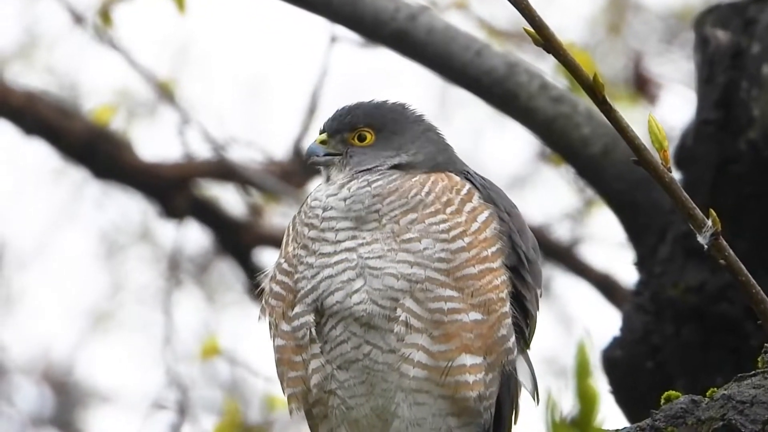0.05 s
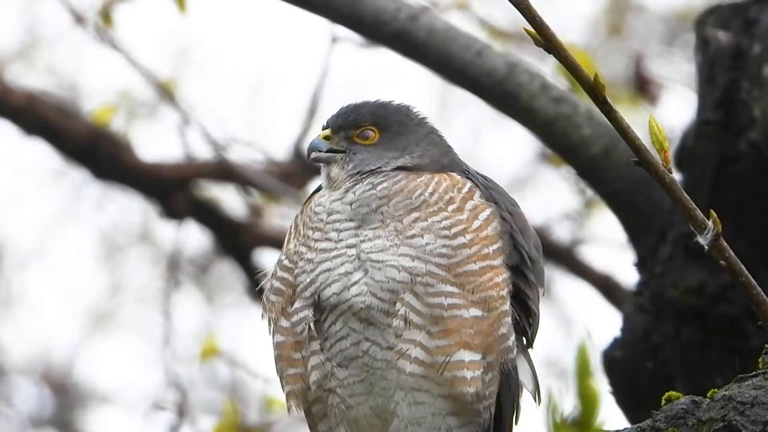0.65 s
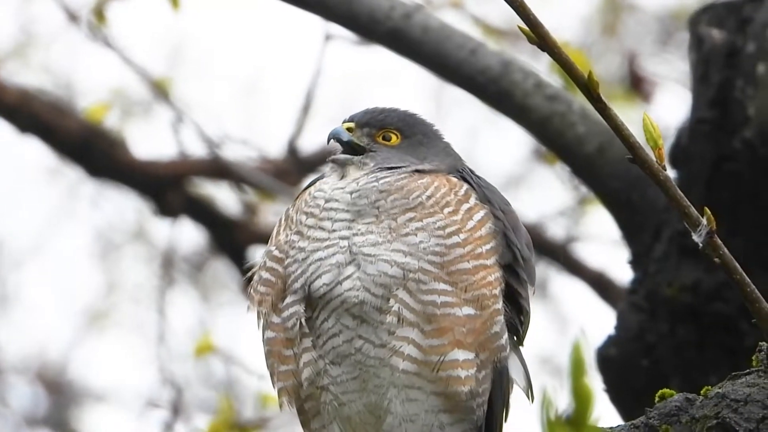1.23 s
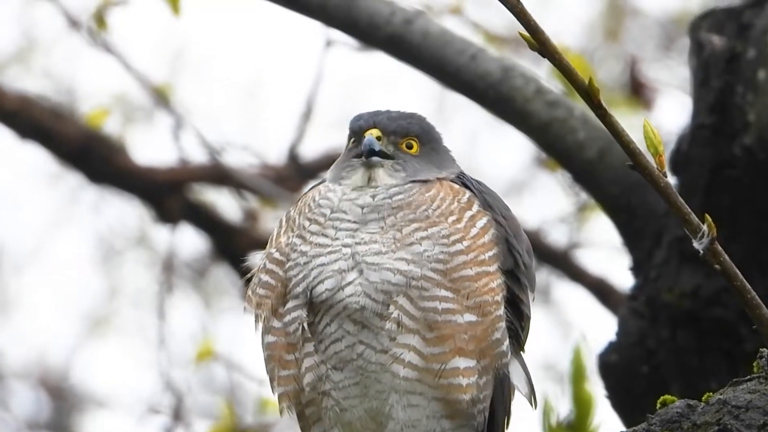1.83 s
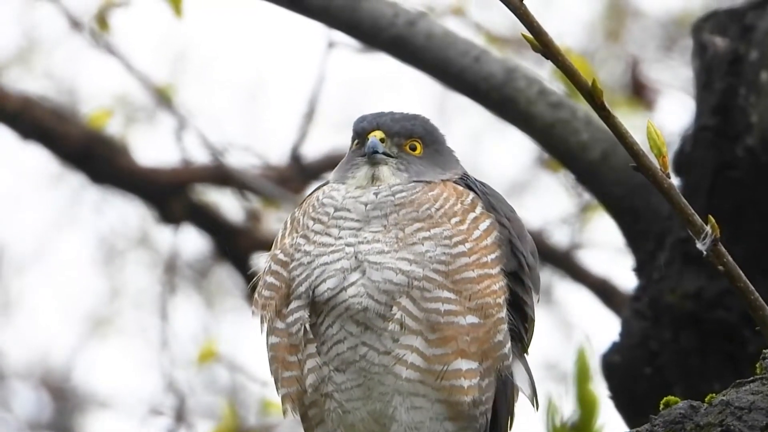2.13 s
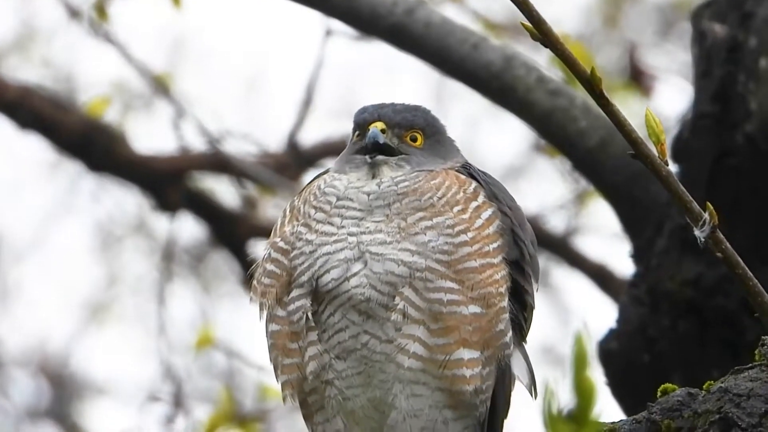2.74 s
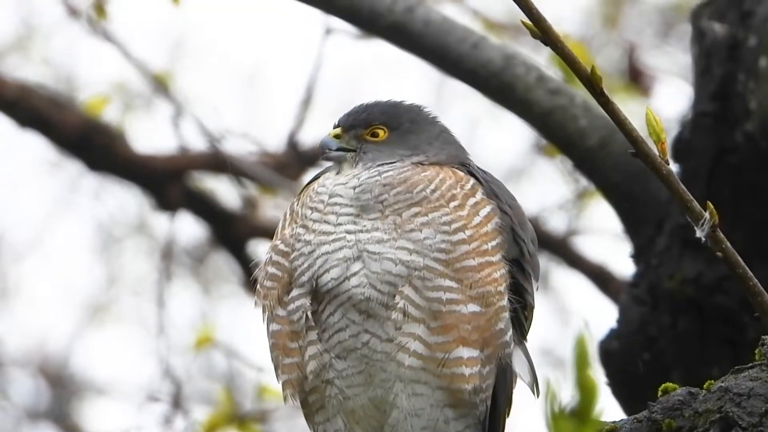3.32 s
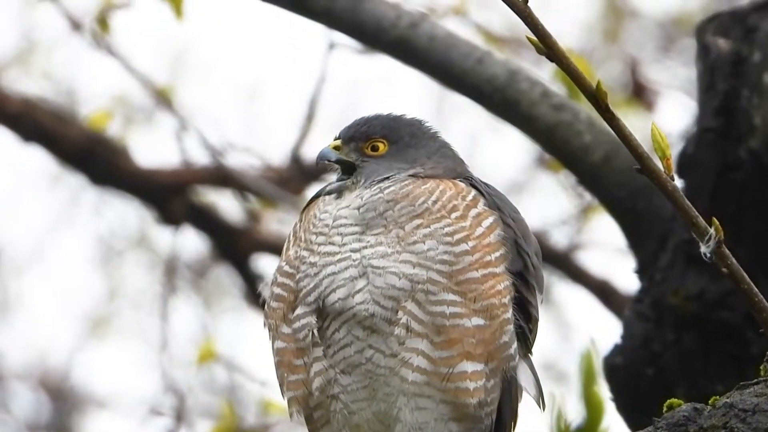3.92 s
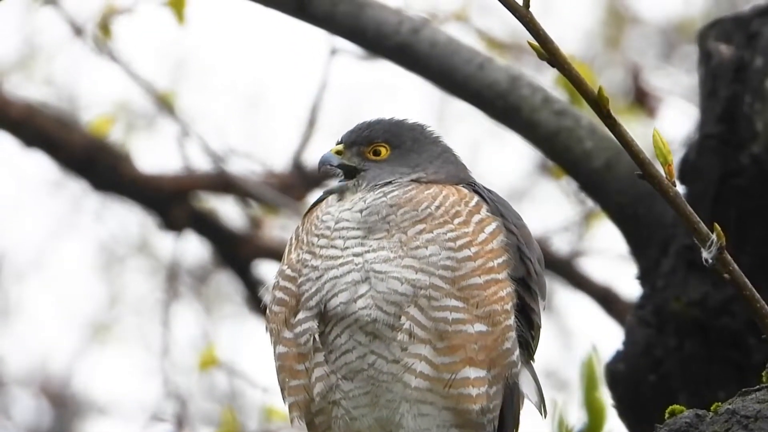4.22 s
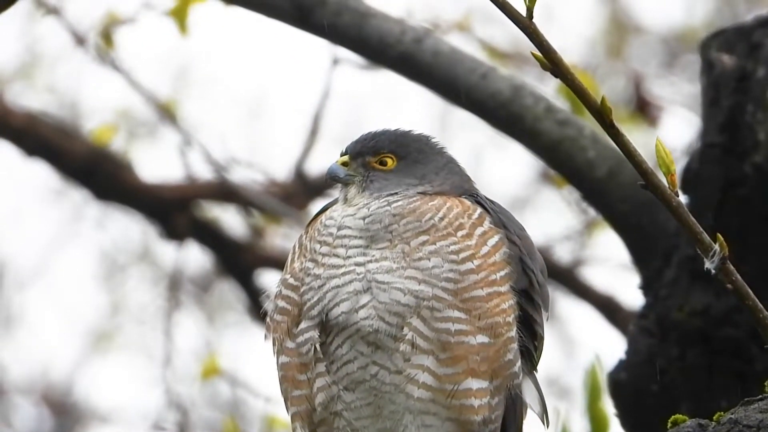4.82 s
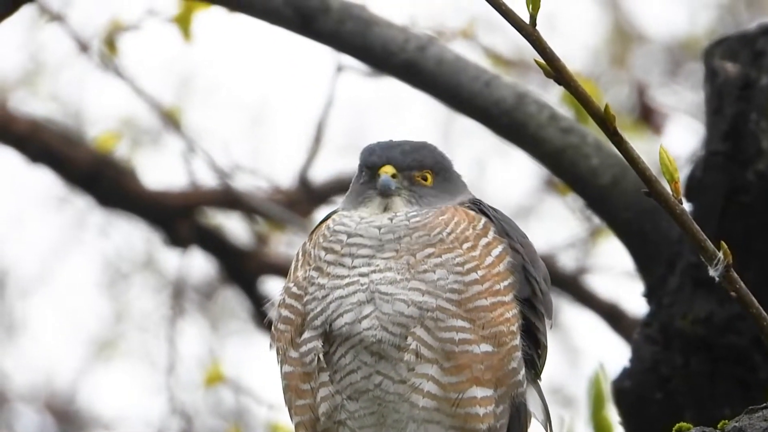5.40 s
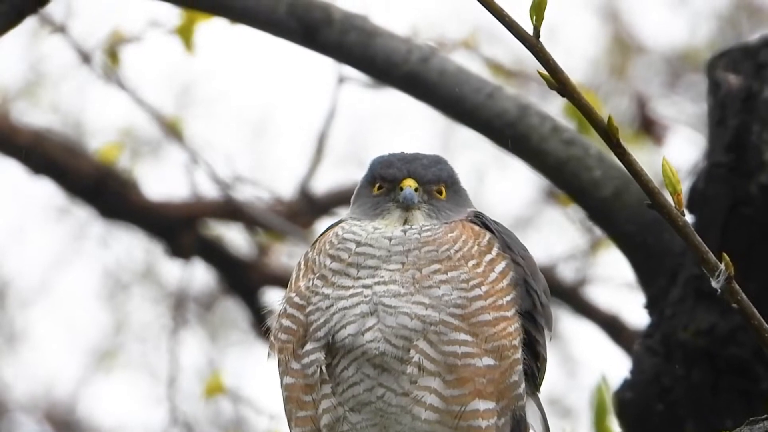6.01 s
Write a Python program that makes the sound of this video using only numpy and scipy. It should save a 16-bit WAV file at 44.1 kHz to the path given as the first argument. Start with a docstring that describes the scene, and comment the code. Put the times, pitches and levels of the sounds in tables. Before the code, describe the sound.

Short shrill calls from a small hawk in a tree repeat and grow louder, echoing lightly, with far traffic humming behind.

```python
"""Far traffic hums throughout, under the hiss of two closely spaced microphones.
From the start a small hawk in a tree calls eighteen short arched notes, soft at first, then loud:
each is four harmonics filtered by the throat, and branches and grove reflect it.
Near 1.8 s the bird faces the listener and its call brightens. A tick (2.3 s) and a low bump (2.5 s)
sound close by. By 3.7 s the beak points aside again; the last note comes at 4.7 s and dies away."""
import sys
import numpy as np
from scipy import signal
from scipy.fft import rfft, irfft, next_fast_len
from scipy.io import wavfile

SR = 44100
rng = np.random.default_rng(int(sys.argv[2]) if len(sys.argv) > 2 else 0)


def pcm_store(signal):
    """Save signal as 16-bit PCM."""
    levels = np.round(np.clip(np.atleast_2d(signal), -1, 1) * 32767)
    wavfile.write(sys.argv[1], SR, levels.astype(np.int16).T)


N = 267069

# the bird turns its head: (time [s], facing [0 beak aside .. 1 beak toward the listener])
FACING = [(1.55, 0), (1.8, 0.99), (3.15, 0.63), (3.7, 0.052)]


def gain_of(db):
    """Amplitude ratio of a level in decibels."""
    return 10 ** (np.asarray(db) / 20)


def add(mix, start_s, sound):
    """Superposition: a sound adds to the mix from start_s on."""
    part = mix[max(round(start_s * SR), 0):][:len(sound)]
    part += sound[:len(part)]


def resonance(hz, centre_hz, width_hz):
    """Lorentzian power response of one resonance, 1 at its centre."""
    return 1 / (1 + (2 * (hz - centre_hz) / width_hz) ** 2)


def coloured_noise(spectrum):
    """Spectral shaping: white noise filtered by a curve over log frequency, then scaled to rms 1."""
    size = next_fast_len(N)
    hz = np.fft.rfftfreq(size, 1 / SR)
    point_hz, point_db = np.transpose(spectrum)
    shape = gain_of(np.interp(np.log(hz + 1), np.log(point_hz + 1), point_db))
    noise = irfft(rfft(rng.standard_normal(size)) * shape, size)[:N]
    return noise / np.sqrt(np.mean(noise ** 2) + 1e-20)


def wander(size, rate):
    """Random modulation: low-passed noise of rms 1 that changes about rate times a second."""
    window = signal.windows.hann(int(2 * SR / rate) + 3)
    white = rng.standard_normal(size + len(window) - 1)
    return signal.fftconvolve(white, window / np.linalg.norm(window), "valid")


def traffic(tyre_db=-40, swell_db=-0.08, rumble_trim_db=-2):
    """Amplitude-modulated noise: far tyres barely swell, over a low rumble that comes and goes."""
    # tyre noise and rumble: (frequency [Hz], relative spectral density [dB])
    tyre_spectrum = [(20, -17), (60, -12), (200, -7.5), (280, -12.5), (450, -7.5), (620, -2.5), (800, 1),
                     (1000, -2), (1300, -6), (2000, -10), (3200, -13.5), (5000, -15.5), (8000, -20.5),
                     (16000, -39)]
    rumble_spectrum = [(10, -25), (30, 0.5), (60, 2), (110, 1), (180, -8), (280, -30), (800, -70)]
    # envelope of the rumble: (time [s], level before the trim [dB])
    rumble_envelope = [(0.2, -66.5), (1.37, -55), (2.56, -61.5), (2.69, -53.5), (3.75, -62.5), (4.78, -50),
                       (6.05, -52.5)]
    tyres = gain_of(tyre_db + swell_db * wander(N, 9.5)) * coloured_noise(tyre_spectrum)
    rumble_db = np.interp(np.arange(N) / SR, *np.transpose(rumble_envelope)) + rumble_trim_db
    return tyres + gain_of(rumble_db) * coloured_noise(rumble_spectrum)


def knocks():
    """Gaussian tone pulses: a few cycles each, heard as a sharp tick and a soft low bump."""
    # small knocks nearby: (time [s], frequency [Hz], envelope peak [dB], 1/e half-width [s])
    pulses = [(2.2846, 3380, -15.5, .0015), (2.286, 1560, -35, .004), (2.547, 200, -30.5, .006)]
    t = np.arange(-SR // 40, SR // 40) / SR
    sound = np.zeros(N)
    for centre_s, hz, db, width_s in pulses:
        envelope = gain_of(db) * np.exp(-(t / width_s) ** 2)
        add(sound, centre_s + t[0], envelope * np.sin(2 * np.pi * hz * t))
    return sound


def grove(voice, near_t60=0.058, build_up_s=0.0068, stereo_spread=0.29, trunks_per_s=1500):
    """Reverberation: twigs close by scatter a short wash; the many trunks return a long tail."""
    # response of the trees: (frequency [Hz], reverberation time of the tail [s], gain [dB])
    bands = [(1700, 0.95, 6.5), (3380, 0.94, 3), (5590, 0.92, 3.5), (6880, 0.61, 15)]
    band_hz, t60, band_db = np.transpose(bands)
    t = np.arange(SR + SR // 2) / SR
    stereo = (2, len(t))
    onset = 1 - np.exp(-t / build_up_s)
    trunks = onset * np.sign(rng.standard_normal(stereo)) * (rng.random(stereo) < trunks_per_s / SR)
    twigs = onset * rng.standard_normal(stereo) * 1000 ** (-t / near_t60)
    # balance the energy of tail and wash ahead of the band gains
    trunks *= gain_of(-15.5) / np.linalg.norm(trunks * 1000 ** (-t / t60.mean()), axis=1, keepdims=True)
    twigs *= gain_of(-18) / np.linalg.norm(twigs[0])
    hz, frame_s, (far, near) = signal.stft(np.array([trunks, twigs]), SR, nperseg=256)
    decay = 1000 ** (-frame_s / np.interp(hz, band_hz, t60)[:, None])
    colour = gain_of(np.interp(hz, band_hz, band_db))[:, None]
    impulse_response = signal.istft((far * decay + near) * colour, SR, nperseg=256)[1]
    mid, side = signal.fftconvolve(voice[None], impulse_response, axes=1)[:, :N]
    return np.array([mid + stereo_spread * side, mid - stereo_spread * side])


def branches(voice, front_db=-8.5):
    """Interference: early echoes beat against the gliding pitch, most when the beak points aside."""
    # echoes from the trunk and nearest branches: (delay [s], gain with the beak aside [dB])
    reflections = [(0.0145, -24), (0.019, -40.5), (.029, -12), (0.045, -22.5)]
    facing = np.interp(np.arange(N) / SR, *np.transpose(FACING))
    incident = voice * gain_of(front_db * facing)
    echoes = np.zeros(N)
    for delay_s, db in reflections:
        add(echoes, delay_s, gain_of(db) * incident)
    return echoes


def hawk_note(top_s, top_hz, rise_s, fall_s, effort_db, jitter=0.0011, flutter_db=0.7, grain_db=3.5):
    """Source and filter: the harmonics of an arching pitch glide through fixed peaks and notches."""
    # harmonics 1 to 4: (base level from the side [dB], gain from the front [dB],
    # growth with effort [dB/dB], growth with pressure [dB/dB])
    harmonics = [(-30.5, 9, 0.78, 3), (-12.5, 0, .5, 1.32), (-18.5, 2.5, 1.48, 3), (-51.5, 13.5, 0.5, 5)]
    # dips in the second harmonic: (centre [Hz], width [Hz], side depth [dB], front depth [dB])
    notches = [(3234, 114, 17, 6.5), (3545, 125, 3.5, 9.5)]
    t = np.arange(-1.15 * rise_s, 1.15 * fall_s, 1 / SR)
    u = t / np.where(t < 0, rise_s, fall_s)  # -1 start of the rise, 0 pitch top, 1 end of the fall
    arch = np.where(u < 0, abs(u) ** 2.5, (np.sin(1.35 * u) / np.sin(1.35)) ** 2)  # flattens at the foot
    sag_hz = max(199.2, top_hz - 1552.5)  # the highest notes sink further, to a common foot
    hz = (top_hz - sag_hz * arch) * (1 + jitter * wander(SR // 4, 610)[:len(t)])
    cycles = np.cumsum(hz) / SR
    facing = np.interp(top_s, *np.transpose(FACING))
    weak = 1 / (1 + np.exp((top_hz - 1688) / 8.7))  # notes topping out above 1688 Hz are in full voice
    # the air pressure swells, holds and lets go, with a slight flutter
    pressure_db = np.where(u < 0, -13 * abs(u) ** 2.92, -4 * abs(u) ** 2.37)
    pressure_db += flutter_db * wander(SR // 4, 170)[:len(t)]
    # the throat resonance favours the fundamental
    first_db = 10 * np.log10(resonance(hz, centre_hz=1684, width_hz=62.4))
    # the second harmonic breaks into pulses at the notches and fades below a cut-off
    dips_db = sum((side + facing * (front - side)) * resonance(2 * hz, centre, width)
                  for centre, width, side, front in notches)
    cutoff_hz, weak_fade_db = 3112, 5.5
    cutoff_loss_db = 10 * np.log10(1 + (cutoff_hz / (2 * hz)) ** 60)
    second_db = -dips_db - weak * weak_fade_db * abs(u) - cutoff_loss_db
    # the third lags on the rise, in weak notes blooming only on the way down, and dies early
    lag_side_db, lag_front_db, lag_weak_db, release_db = 6.5, 1, 20.5, 29
    lag_db = lag_side_db + facing * (lag_front_db - lag_side_db) + weak * lag_weak_db
    third_db = lag_db * np.minimum(u - 0.5, 0) - release_db * np.maximum(u - 0.75, 0)
    # the beak resonance favours the faint, grainy fourth
    fourth_db = 10 * np.log10(resonance(4 * hz, centre_hz=6780, width_hz=430))
    fourth_db += grain_db * wander(SR // 4, 510)[:len(t)]
    sound = np.zeros(len(t))
    for k, colour_db in enumerate([first_db, second_db, third_db, fourth_db], 1):
        side_db, front_db, per_effort, per_pressure = harmonics[k - 1]
        db = side_db + facing * front_db + per_effort * effort_db + per_pressure * pressure_db + colour_db
        sound += np.sqrt(2) * gain_of(db) * np.cos(2 * np.pi * k * cycles)
    return top_s + t[0], sound * signal.windows.tukey(len(t), 0.14)


def hawk():
    """Direct sound: the run of notes as it arrives ahead of any reflection."""
    # the call: (time of the pitch top [s], top pitch [Hz], rise [s], fall [s], effort [dB])
    notes = [(0.08, 1448, .013, 0.073, -18), (0.378, 1656, 0.017, 0.065, -10.4),
             (0.671, 1663, 0.024, .051, -4), (0.936, 1629, .033, 0.059, -4.5),
             (1.172, 1654, .026, 0.065, -2.5), (1.402, 1701, 0.035, 0.049, 1.2),
             (1.642, 1746, 0.036, 0.051, .8), (1.903, 1714, .041, 0.047, -2.5),
             (2.144, 1768, 0.044, .053, 2), (2.401, 1762, 0.049, 0.048, 0.5),
             (2.646, 1752, 0.048, 0.047, 0.7), (2.903, 1754, .039, .050, -1.1),
             (3.168, 1777, 0.044, .055, 0), (3.492, 1824, 0.036, .047, 0.3),
             (3.7706, 1830, 0.034, .056, 0.1), (4.0586, 1859, 0.037, 0.053, 2.5),
             (4.367, 1769, .037, 0.053, 0), (4.696, 1771, 0.043, .045, -0.3)]
    voice = np.zeros(N)
    for row in notes:
        add(voice, *hawk_note(*row))
    return voice


def scene(right_delay_s=2.1e-5):
    """Path difference: bird, echoes and background sum, and reach the right microphone slightly later."""
    voice = hawk()
    left, right = voice + branches(voice) + grove(voice) + knocks() + traffic()
    size = next_fast_len(N)
    phase_lag = np.exp(-2j * np.pi * np.fft.rfftfreq(size, 1 / SR) * right_delay_s)
    return np.array([left, irfft(rfft(right, size) * phase_lag, size)[:N]])


def record(dry, hiss_db=-49.5, band_limit_hz=15850):
    """Uncorrelated self-noise: each microphone adds its own hiss; a low-pass then limits the band."""
    # microphone hiss: (frequency [Hz], relative spectral density [dB])
    hiss_spectrum = [(20, -2.5), (200, -8), (800, -4), (1500, -6), (4000, -3.5), (8000, -7), (12000, -7.5),
                     (16000, -9)]
    hiss = gain_of(hiss_db) * np.array([coloured_noise(hiss_spectrum) for _ in range(2)])
    low_pass = signal.firwin(511, band_limit_hz, window=("kaiser", 9), fs=SR)
    return signal.oaconvolve(dry + hiss, low_pass[None], "same")


dry = scene()
out = record(dry)
pcm_store(out)
```